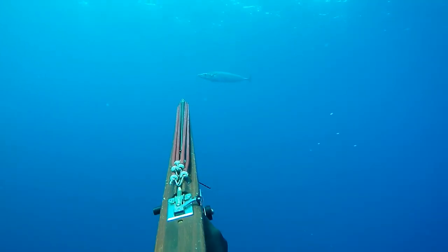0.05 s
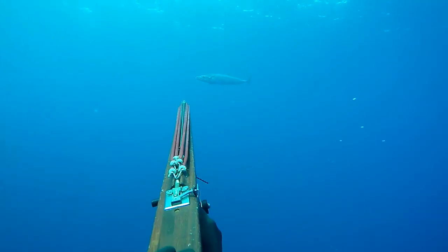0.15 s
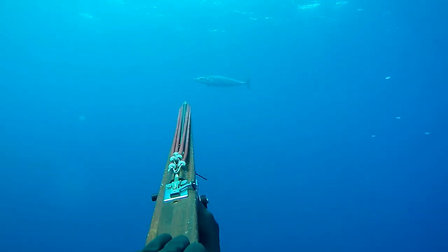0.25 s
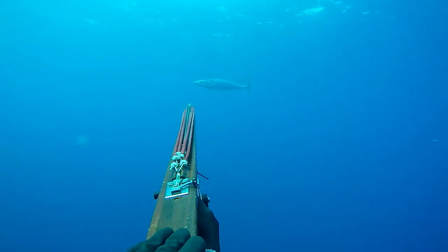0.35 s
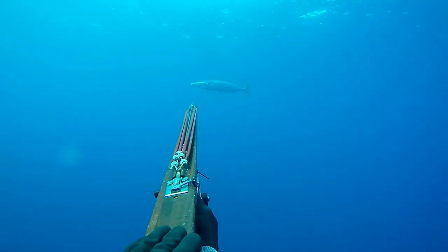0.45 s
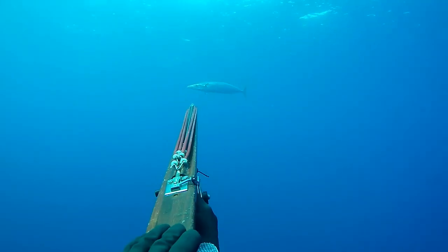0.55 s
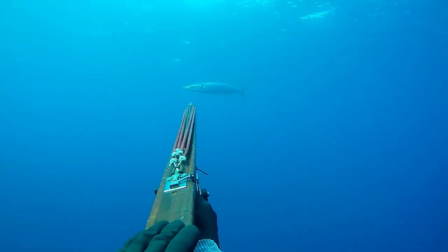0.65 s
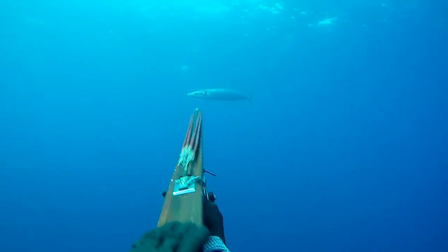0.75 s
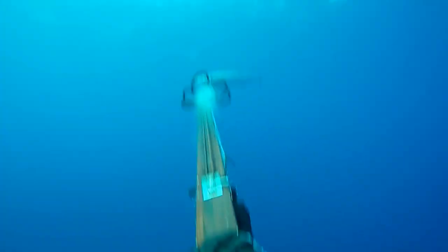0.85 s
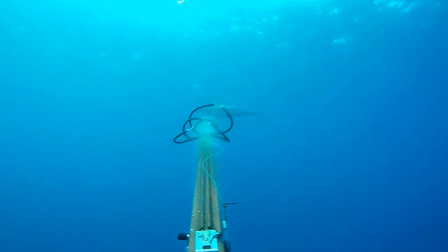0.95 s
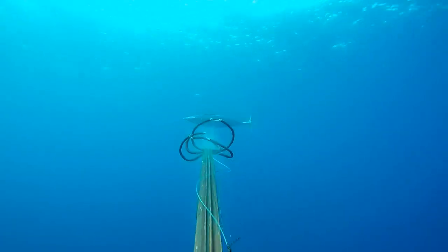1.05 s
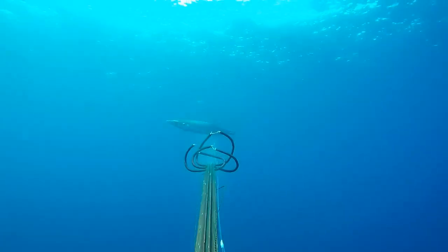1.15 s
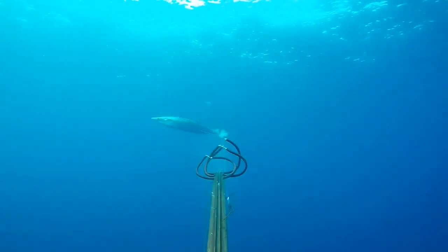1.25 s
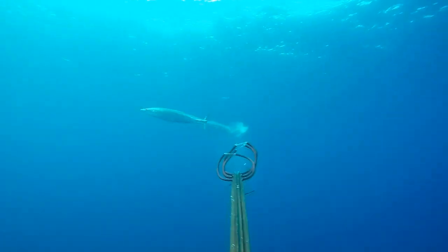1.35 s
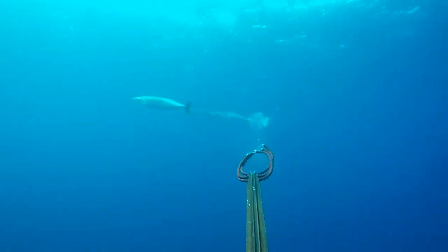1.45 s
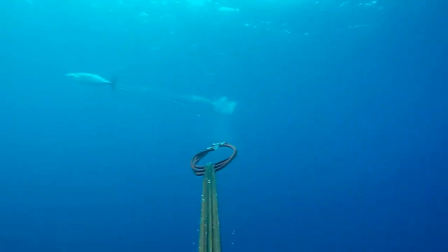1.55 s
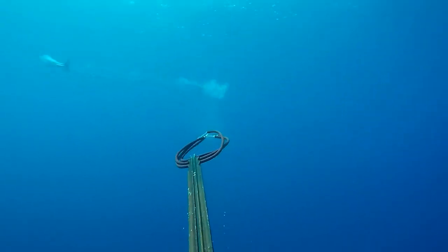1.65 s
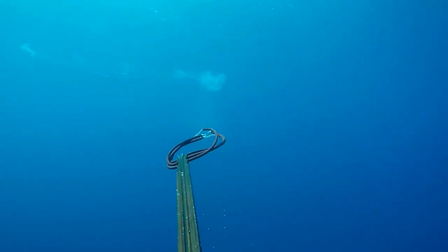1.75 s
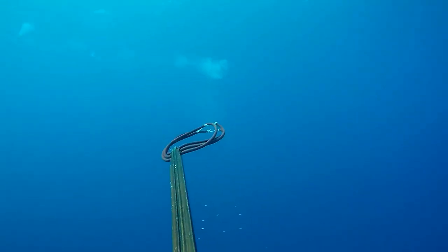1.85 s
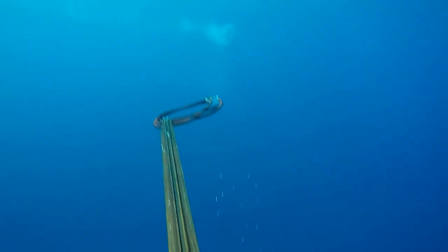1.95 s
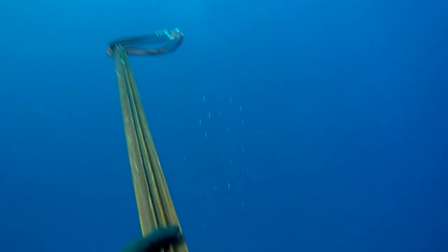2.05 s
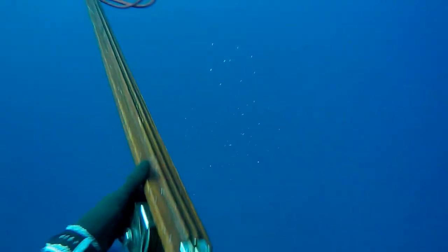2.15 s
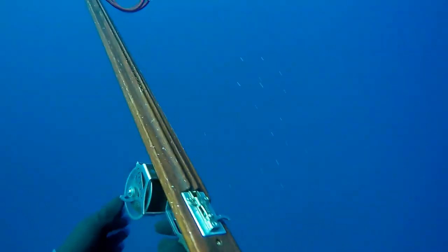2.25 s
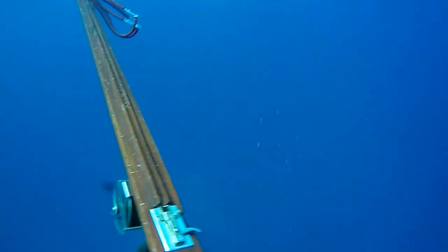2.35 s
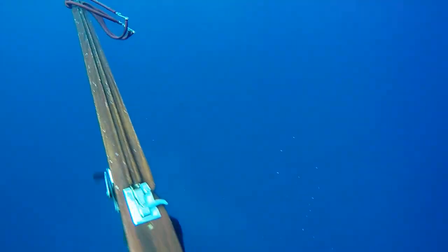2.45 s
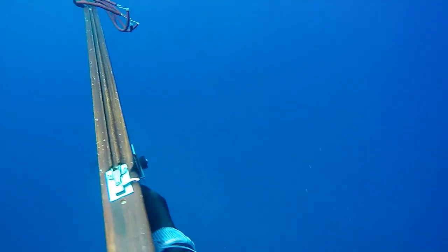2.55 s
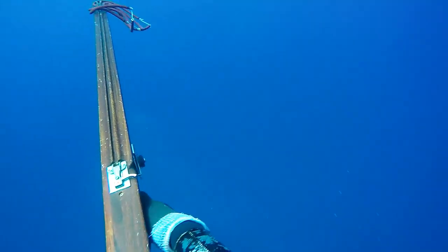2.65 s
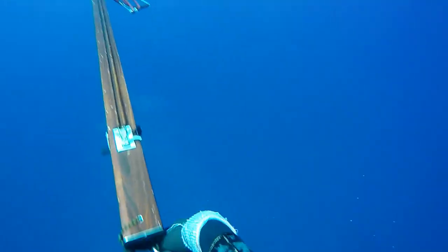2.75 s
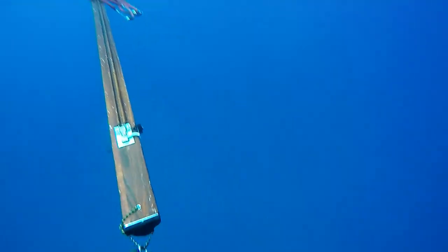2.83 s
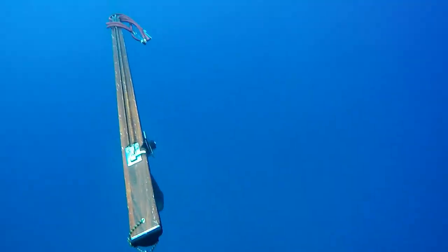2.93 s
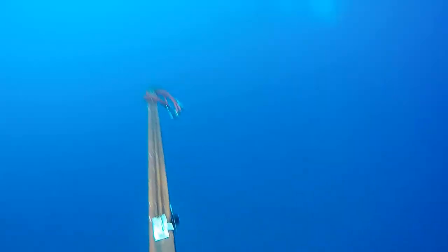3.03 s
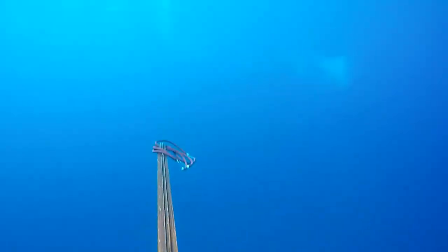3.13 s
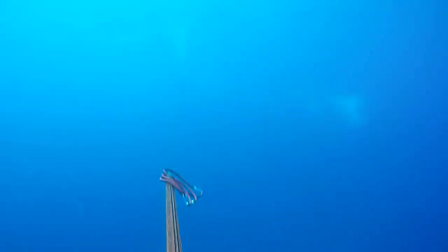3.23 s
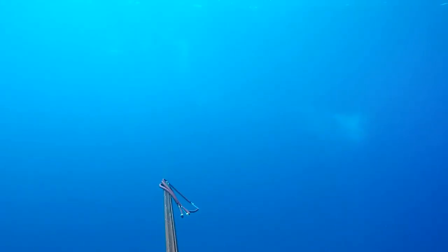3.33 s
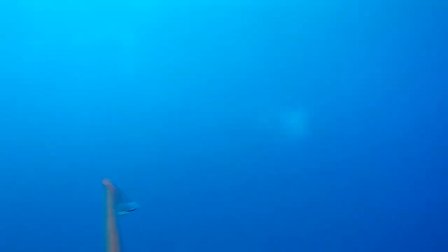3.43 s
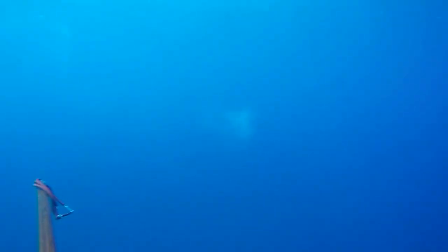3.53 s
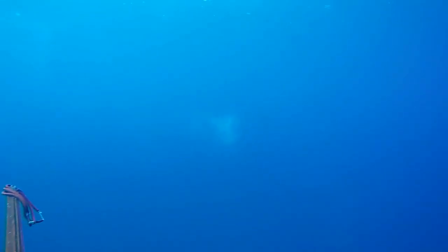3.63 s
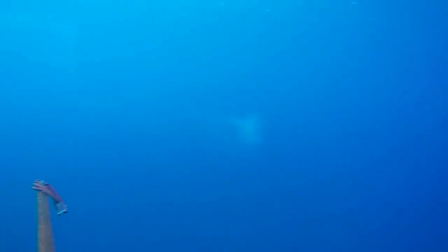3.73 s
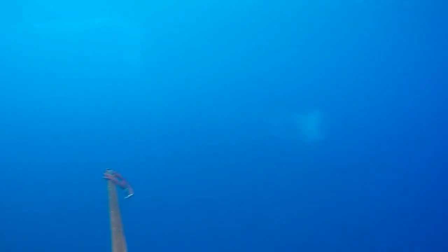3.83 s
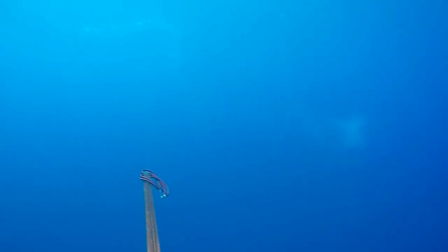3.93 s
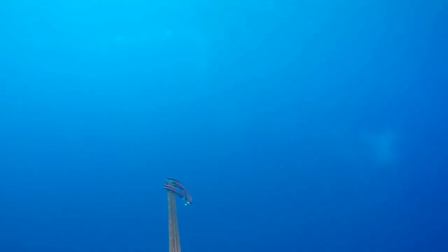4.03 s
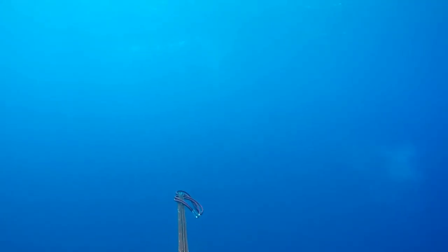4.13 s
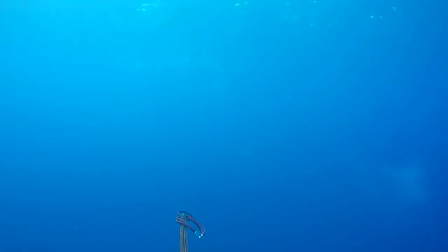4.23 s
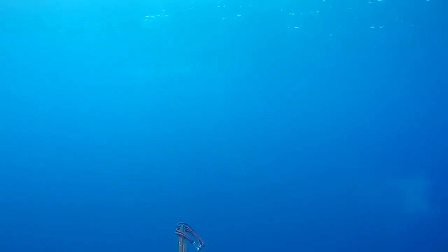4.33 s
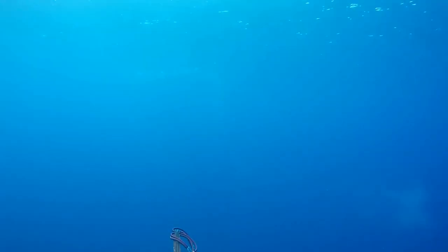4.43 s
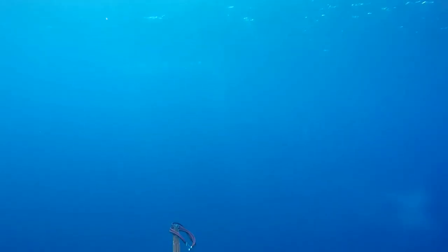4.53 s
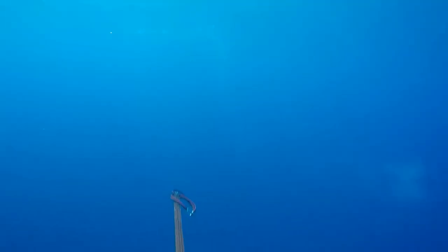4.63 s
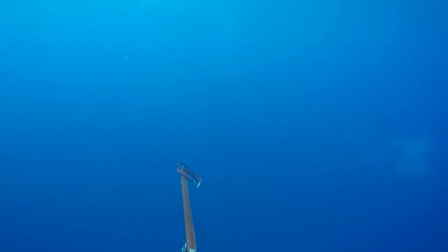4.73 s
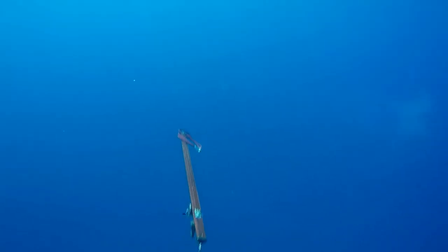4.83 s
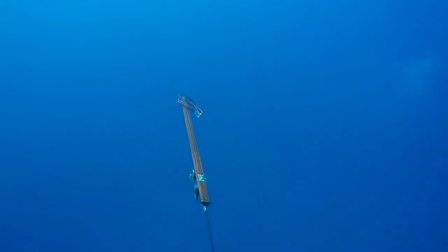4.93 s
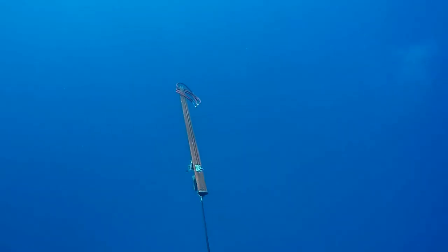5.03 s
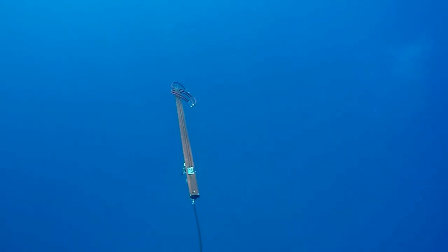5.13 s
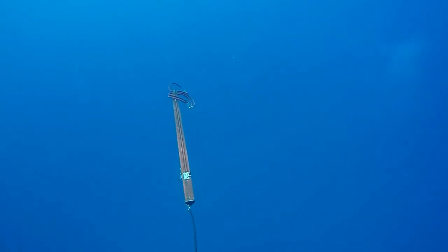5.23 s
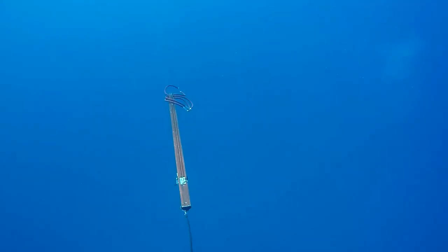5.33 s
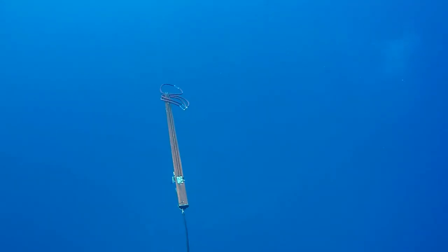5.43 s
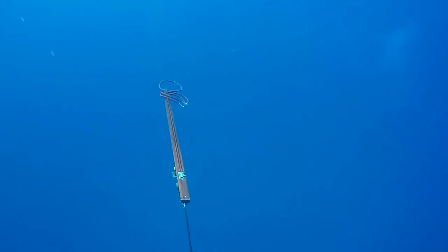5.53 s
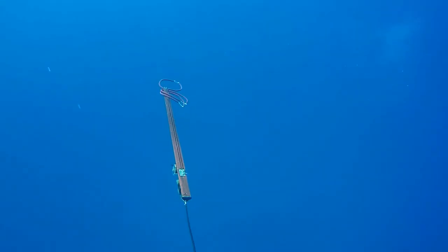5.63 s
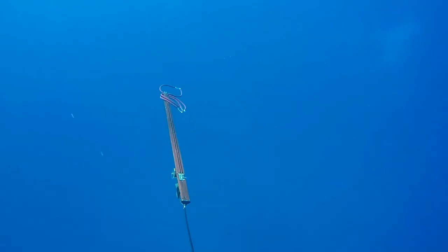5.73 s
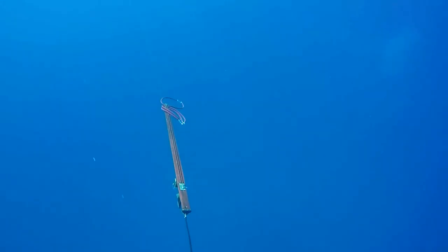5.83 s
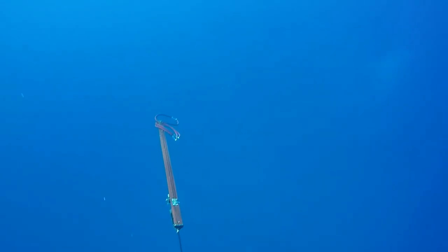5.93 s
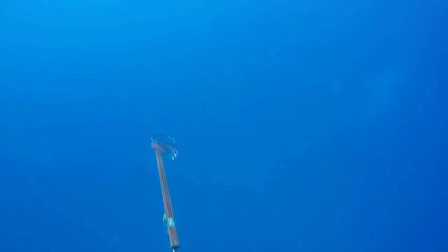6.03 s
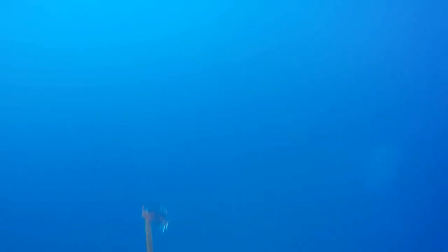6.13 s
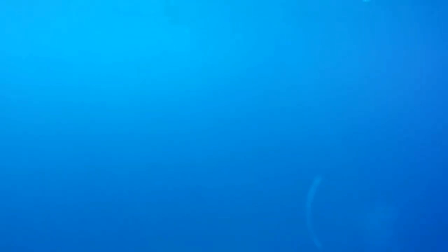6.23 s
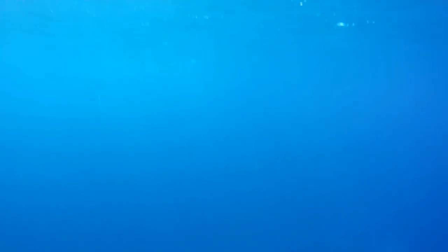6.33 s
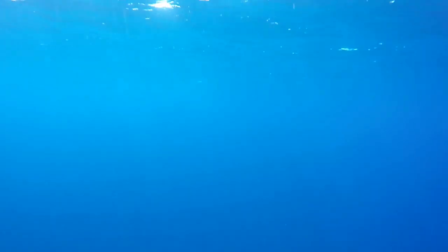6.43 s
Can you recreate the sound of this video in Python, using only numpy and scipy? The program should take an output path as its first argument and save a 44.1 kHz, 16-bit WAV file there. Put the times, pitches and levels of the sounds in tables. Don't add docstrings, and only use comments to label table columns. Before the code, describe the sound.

Underwater, close inside a plastic camera housing: low soft rumble and faint clicks, then a speargun fires with a hard boxy crack and deep thump. Fizz fades quickly into near quiet. A reel bursts into rapid rattling with gulping bubbles and loud knocks, then smooths into a rushing hiss with a hollow sweeping colour and tiny pings. Low thumps bump the housing until the end.

```python
import sys
import numpy as np
from scipy import signal
from scipy.fft import rfft, irfft
from scipy.io import wavfile
from scipy.ndimage import uniform_filter1d

SR = 44100
rng = np.random.default_rng(int(sys.argv[2]) if len(sys.argv) > 2 else 0)


def voltage_ratio(decibels):
    exponent = np.asarray(decibels, float) / 20
    return 10 ** exponent


def to_wav(sig):
    pcm = np.clip(np.atleast_2d(sig), -1, 1) * 32767
    pcm = np.round(pcm).astype(np.int16)
    wavfile.write(sys.argv[1], SR, pcm.T)


N = 285768
T = np.arange(N) / SR

# (frequency [Hz], width [Hz], level [dB])
WALL_MODES = [(307, 360, -9.5), (721, 240, -6.5), (950, 166, -6), (1370, 530, -8.5), (2156, 304, 2.5),
              (3668, 830, -7), (4520, 400, -17), (6320, 1200, -22), (7670, 470, -34), (9650, 2500, -32.5),
              (11860, 1900, -35), (13300, 900, -43)]
# (frequency [Hz], width [Hz], gain [dB])
WALL_VALLEYS = [(1108, 190, -3.5), (1710, 360, 1), (2610, 143, -10.5), (2958, 150, -9.5), (5650, 210, -9),
                (7160, 380, -5), (8740, 500, -2.5), (11300, 500, -3)]

# (time [s], swell level [dB])
FLOW = [(0.0, -34.5), (0.3, -40.5), (0.5, -37.5), (0.74, -36), (1.0, -25.5), (1.5, -26.5), (2.0, -23.5),
        (2.5, -21), (2.9, -18), (3.5, -26), (3.9, -22.5), (4.4, -28), (5.1, -23), (5.55, -30), (5.8, -20.5),
        (6.0, -26), (6.48, -20)]
# (middle [s], extra swell [dB], extra flutter [dB], half length [s])
EDDIES = [(0.0, 11.5, -10, 0.052), (0.08, -6, -9, 0.054), (.434, 6, -12, 0.045), (0.937, -3, 11, .05),
          (1.253, 3, -19, 0.11), (1.65, 12, 3.5, 0.094), (1.886, 8, -6, 0.082), (1.97, -2.5, 8, 0.093),
          (2.063, 5, 2, 0.059), (2.197, 0.5, 10, 0.11), (1.46, -3.5, 0, 0.046), (2.337, 8.5, -10, 0.026),
          (2.376, -25, -5, 0.032), (2.453, -1.5, -2, 0.082), (2.65, -11, -7, 0.085),
          (2.922, -2.5, -17, 0.13), (3.272, 3, 6, 0.14), (3.793, 6, -6, 0.14), (3.923, -3.5, 5.5, 0.043),
          (4.113, 1.5, -15, 0.041), (4.19, 2, 25, 0.048), (4.242, -18, 4.5, 0.038), (4.6, 5.5, -4, 0.18),
          (5.905, -4, 3, 0.33), (6.105, 11.5, 6, 0.054), (6.23, 3.5, 5.5, 0.042), (6.296, -0.5, 3.5, 0.043)]
FLUTTER_DB, FLUTTER_GROWTH = -40.5, 1.45
# (middle [s], peak
# level [dB], frequency [Hz], length [cycles])
THUMPS = [(.833, -8, 35, 1.2), (.854, -11, 45, 1.3), (2.178, -12.5, 195, 2), (2.21, -14, 160, 1.9),
          (2.155, -23, 210, 4.3), (2.195, -18, 260, 2.7), (2.235, -16, 173, 2.5), (2.257, -16.5, 242, 3),
          (2.333, -20, 30, 1.2), (2.53, -20.5, 142, 4.8), (2.575, -24, 126, 3.2), (2.295, -16.5, 248, 6.1),
          (2.477, -14.5, 115, 1.6), (3.13, -18, 197, 9.2), (3.31, -27, 136.3, 2.2),
          (4.07, -18, 151.2, 1.74), (4.196, -2.5, 101.4, 7.1), (4.45, -15.5, 143, 1.94),
          (4.565, -15.5, 107, 1.9), (4.908, -9.5, 79, 1.3), (4.965, -21.5, 105.2, 4.3),
          (5.781, -0.5, 134, 2), (5.93, -31.5, 108.4, 6.7), (6.094, -6.5, 104, 2.23), (6.41, -12, 31.8, 3)]
# (middle [s], peak level [dB], frequency [Hz], length [cycles])
RECOIL = [(.794, -8.5, 28.5, 2.2), (.82, 0.4, 83, 1.52), (.848, -16.5, 113, 2.2), (.864, -9, 12.4, 1.3),
          (.885, -12, 49, 1), (.908, -11.5, 27, 2.7), (.95, -20, 20, 2.3)]
# ((pitch [Hz], sag [Hz/s], width [Hz], rise [s], fall [s]), swells (time [s], hold [s], level [dB]))
SONGS = [
    ((152, 5, 62, 0.38, 0.14), [(1.0, 1, -50.5), (1.6, 0.44, -34.5), (2.25, 0.0079, -22.5), (2.55, 0.0082, -35.5), (3.35, 0.1, -41.5)]),
    ((6540, 26, 450, 0.6, .07), [(2.5, 0.98, -59), (3.6, .6, -56.5)]),
    ((5300, 260, 160, .2, 0.16), [(4.3, 0.11, -65), (4.5, .2, -65)]),
    ((640, 86, 285, 0.37, 0.39), [(5.62, 0.41, -44), (6.1, 0.56, -46)]),
]

# (time [s], peak level [dB], pitch [Hz], decay by 60 dB [s])
BUBBLES = [(.813, -12, 1000, .02), (.818, -9, 2330, .03), (.832, -16, 520, .025), (.833, -11, 2250, .025),
           (.838, -14, 1450, .03), (.845, -14, 3700, .02), (.849, -9.5, 720, .035), (.853, -9, 2300, .025),
           (.888, -21, 2200, .04), (.995, -33, 950, .049), (1.075, -30.5, 2270, .06),
           (1.079, -36, 1160, .06), (1.08, -36, 1900, .04), (1.13, -40, 1830, .04), (1.183, -44, 950, .044),
           (1.21, -26.5, 905, .037), (1.211, -39, 3550, .035), (1.36, -37, 800, .038),
           (1.423, -24.5, 1320, .075), (1.424, -33, 1550, .03), (1.45, -40, 1750, .03),
           (1.481, -34.5, 8200, .006), (1.481, -33, 1450, .015), (1.556, -34, 6300, .025),
           (1.966, -16.5, 4400, .024), (1.975, -5.5, 1110, .066), (1.976, -13.5, 3050, .027),
           (2.026, -13, 2310, .049), (2.026, -7, 1350, .025), (2.035, -5, 1695, .019),
           (2.039, -4.5, 1207, .044), (2.041, -16, 7900, .011), (2.091, -23, 538, .07),
           (2.244, -15, 1300, .07), (2.288, -19, 1650, .05), (2.584, -21.5, 1640, .067),
           (3.795, -25, 400, .035), (4.05, -49, 7700, .015), (4.205, -50, 8500, .012),
           (4.205, -42, 6750, .025), (4.68, -50, 7700, .02), (5.61, -23, 615, .049),
           (5.611, -21.5, 316, .027), (6.229, -31, 1110, .032), (6.252, -35, 7600, .012),
           (6.252, -40, 5240, .0094), (6.264, -31, 8940, .0075), (6.265, -23, 5050, .013),
           (6.359, -48, 10500, .012)]
# (time [s], peak level [dB], pitch [Hz])
PINGS = [(2.3643, -37, 6500), (2.39, -33, 6500), (2.4162, -41, 6500), (2.4421, -37, 6420),
         (2.4706, -41, 6480), (2.49, -37, 6430), (2.5683, -40, 6370), (2.6726, -46, 6530),
         (2.696, -37, 6300), (2.957, -39, 6350), (3.0752, -39, 6570), (3.1256, -42, 6440),
         (3.145, -38, 6570), (3.2253, -39, 6600), (3.2423, -34, 6440), (3.2687, -31, 6500),
         (3.295, -29, 6520), (3.3201, -34, 6700), (3.3471, -33, 6500), (3.3955, -44, 6540),
         (3.4219, -42, 6450), (3.4583, -42, 6420), (3.5491, -41, 6400), (3.573, -34, 6750),
         (3.605, -45, 6650), (3.6564, -33, 6720), (3.6833, -32, 6440), (3.7077, -40, 6500),
         (3.7536, -41, 6650), (3.7891, -39, 4900), (3.801, -40, 6720), (3.824, -37, 6440),
         (3.8584, -37, 6100), (3.8789, -36, 6430), (3.9053, -34, 6400), (3.9452, -39, 6500),
         (3.9637, -36, 6400), (4.0056, -45, 6420), (4.024, -44, 6440), (4.0789, -40, 6560),
         (4.1517, -43, 6730), (4.1901, -40, 6520), (4.2076, -37, 6250), (4.3253, -46, 5150),
         (4.3712, -46, 6440), (4.4984, -48, 5200), (4.5448, -47, 5330), (4.6087, -47, 4990),
         (4.681, -47, 6100)]
# (time [s], peak level [dB], pitch [Hz])
GULPS = [(1.527, -26, 735), (1.576, -19, 1170), (1.59, -16, 707), (1.615, -14, 683), (1.635, -8, 950),
         (1.684, -18, 970), (1.714, -18, 713), (1.721, -14, 716), (1.747, -16, 700), (1.778, -19, 950),
         (1.811, -13, 930), (1.837, -17, 736), (1.857, -13, 1010), (1.874, -18, 790), (1.9, -12, 764),
         (1.914, -23, 797), (1.935, -15, 756), (2.08, -23, 930), (2.137, -19, 990), (2.156, -23, 870)]

# (time [s], peak level [dB], body re. peak [dB], treble re. peak [dB])
GEAR_KNOCKS = [(.0554, -42, -26, 2), (.0732, -40, -21, -12), (.341, -49.5, -12, 6), (.6933, -47, -19, 0),
               (.703, -48, -19, 3), (.794, -30, -9, -4), (.8111, -2.5, -6, -14), (.8804, -17.5, 5.5, -6),
               (.914, -22, -7, -6), (.906, -32, -10, 6), (.952, -36, -10, 1), (.9188, -11.5, -6.5, -2.5),
               (.9632, -14.5, -7, -6.5), (.9685, -23.5, 0, -12), (.9764, -23, -18, -1.5),
               (1.0284, -47, -7, 3), (1.054, -39, -10, -1), (1.0745, -38, -7, 3), (1.0814, -35, -12, -10),
               (1.2087, -60, 4, -5), (1.2685, -42, -4, 0), (1.2815, -42, -1, -10), (1.3064, -41, -14, -12),
               (1.3374, -40.5, -8, -0.5), (1.4217, -46, 8, -18), (1.4516, -38, -2, -24),
               (1.48, -39.5, 1, -5), (6.2274, -34, -1, 6.5)]
# (time [s], peak level [dB], body re. peak [dB], treble re. peak [dB])
REEL_KNOCKS = [(1.512, -25, -16, -28.5), (1.5424, -22, -3, -19), (1.5914, -19, 4, -5),
               (1.6312, -5, -1.5, -5.5), (1.6354, -5, -12, -30), (1.6555, -12, -3, -2),
               (1.6811, -9, -6, -4.5), (1.686, -16, 0, -8), (1.7024, -16, 2, -3), (1.708, -16, -7, -6),
               (1.7204, -18, -10, -14), (1.7399, -7.5, 0.5, -8), (1.745, -14.5, -0.5, -9),
               (1.752, -23, -3, -16), (1.798, -21, -14, -16), (1.8806, -14, -1, -8), (1.995, -19, 0, -9),
               (2.197, -12, -4, -7), (2.0368, -12, 2.5, -5), (2.2383, 6.5, -5, -20), (2.2807, 1, -3, -10),
               (2.287, -15.5, -4, -6), (2.39, -25, -8, -12), (2.413, -30, -16, -14), (2.575, -22, -10, -15),
               (2.634, -29, -10, -4), (2.3184, -24, -10, 1.5), (3.1677, -15.5, -7, -14),
               (3.2425, -12, -5.5, -7), (3.2959, -22.5, -4, -2), (4.3712, -37, -10, 2.5),
               (3.7544, -12, -28, -13), (3.7898, -16, -3, -12.5), (3.8247, -9, -8, -12),
               (3.8591, -8, -8, -11.5)]
SCRAPE_S = 0.00221

# (time [s], level [dB], brightness [dB])
SHOT = [(.811, -15.5, 8.5), (.823, -15, -6.5), (.855, -12, -5.5), (.866, -21.5, -5.5), (.912, -34.5, -6),
        (.921, -23.5, -1.5), (.932, -48, 10), (.96, -42, 0), (.998, -53, 11)]
TEAR_BODY_DB, BOOM_DB, BOOM_FALL_DB_PER_S = -6, -16.5, 325

# (time [s], level of its rush [dB])
PULL = [(1.49, -70), (1.51, -38.5), (1.566, -30), (1.676, -29), (1.718, -25.5), (1.772, -27), (1.876, -26),
        (2.13, -24.5), (2.3, -30), (2.62, -31.5), (2.78, -28), (3.3, -29), (3.61, -32.5), (4.56, -34),
        (5.31, -39), (5.55, -39.5), (6.07, -36.5), (6.48, -41)]
# (time [s], speed [turns/s], chatter depth [0-1])
REEL = [(1.48, 44, 0.1), (1.52, 37.8, 1), (1.75, 47, 0.8), (2.0, 40, 0.55), (2.3, 27, 0.03),
        (3.0, 32, 0.28), (3.9, 36, 0.07), (6.48, 26, 0.08)]
# (time [s], first notch [Hz], strength [0-1])
MIRROR = [(2.57, 700, 0.02), (2.6, 900, .8), (2.65, 1050, .95), (2.74, 1200, .95), (2.82, 1620, .9),
          (2.93, 1620, .85), (3.05, 1720, .8), (3.2, 1750, 0.02)]
BAND_EDGES_HZ = [280, 1750, 2800, 5600, 16000]
PULL_COLOUR_DB = [-4, 0, -11, -21.5]
PULL_GROWTH = [1.23, 1.04, 0.96, 0.93]
DRIFT_DB_PER_S = [0.24, -0.3, 0.42, -0.6]
STILL_DB = [-67.5, -73.5, -62, -65]
CHATTER_SHARE = [0.71, 0.79, 0.87, 0.3]
AIM_S, AIM_DB = 0.77, [-78, -56, -59, -81]
WAKE_S, WAKE_DB = 0.92, [-55.5, -50.5, -53, -79]
WAKE_FALL_DB_PER_S = [15, 19, 79, 20]
NEAR_DB, LET_GO_S, LET_GO_LENGTH_S = [-1, -1, 1.5, 3.5], 3.03, 0.065
SHADOW_S, SHADOW_HALF_S = 2.617, 0.016
SHADOW_DB = [-8.5, -3.5, -4, 2]
GURGLES_PER_S, GURGLE_HZ, GURGLE_DB = 200, (686, 1995), 7
SPARKLES_PER_S, SPARKLE_HZ, SPARKLE_DB = 280, (6790, 13240), -16.5
SPARKLE_S, SPARKLE_FADE_S = 1.52, .5


def curves(table):
    s, *columns = np.transpose(table)
    return [np.interp(T, s, c) for c in columns]


def unit(x):
    return x / np.sqrt(np.mean(x ** 2))


def band(x, lo_hz, hi_hz, order=3):
    return signal.sosfilt(signal.butter(order, [lo_hz, hi_hz], "band", fs=SR, output="sos"), x)


def lowpass(x, hz, order):
    return signal.sosfilt(signal.butter(order, hz, fs=SR, output="sos"), x)


def walk(rate):
    hold = int(SR / rate)
    steps = np.repeat(rng.standard_normal(N // hold + 1), hold)
    return unit(uniform_filter1d(uniform_filter1d(steps, hold), hold)[:N])


def together(*db):
    return 10 * np.log10(sum(voltage_ratio(d) ** 2 for d in db))


def wall_response():
    hz = np.linspace(0, SR / 2, 2049)
    power = sum(voltage_ratio(db) ** 2 / (1 + (2 * (hz - f) / w) ** 2) ** 1.616 for f, w, db in WALL_MODES)
    valley_db = sum(db / (1 + (2 * (hz - f) / w) ** 2) for f, w, db in WALL_VALLEYS)
    power = power * voltage_ratio(valley_db) ** 2
    cepstrum = irfft(np.log(power + 1e-9) / 2)
    cepstrum[1:2048] *= 2
    cepstrum[2049:] = 0
    return irfft(np.exp(rfft(cepstrum)))


def housing(x):
    return signal.fftconvolve(x, wall_response())[:len(x)]


def buffet():
    flow_db, = curves(FLOW)
    swell_db = flow_db
    flutter_db = FLUTTER_DB + FLUTTER_GROWTH * (flow_db + 25)
    for s, more_swell_db, more_flutter_db, half_s in EDDIES:
        shape = 1 / (1 + ((T - s) / half_s) ** 2) ** 2
        swell_db = swell_db + more_swell_db * shape
        flutter_db = flutter_db + more_flutter_db * shape
    swell = unit(band(rng.standard_normal(N), 13.9, 38.9, order=2))
    flutter = unit(band(band(rng.standard_normal(N), 33.0, 241, order=3), 40, 102, order=1))
    return swell * voltage_ratio(swell_db - 1.5) + flutter * voltage_ratio(flutter_db + 4.7 * walk(12))


def pushes(table, overtone):
    out = np.zeros(N)
    for s, db, hz, cycles in table:
        near = slice(int((s - .15) * SR), int((s + .15) * SR))
        turn = (T[near] - s) * hz
        swell = np.exp(-(np.pi * turn / cycles) ** 2)
        overtones = np.cos(4 * np.pi * turn) + 0.45 * np.cos(6 * np.pi * turn)
        sway = np.cos(2 * np.pi * turn) + overtone * swell * overtones
        out[near] += voltage_ratio(db) * sway * swell
    return out


def songs():
    out = np.zeros(N)
    for (hz, sag, width_hz, rise, fall), swells in SONGS:
        levels = []
        for s, hold, peak_db in swells:
            away = np.maximum((s - T) / rise, (T - s - hold) / fall)
            levels.append(peak_db - 30 * away.clip(0, 4))
        db = together(*levels)
        pitch = np.maximum(hz - sag * np.maximum(T - swells[0][0], 0), hz / 2)
        phase = 2 * np.pi * np.cumsum(pitch * (1 + .015 * walk(60))) / SR
        blur = walk(width_hz) * np.cos(phase) + walk(width_hz) * np.sin(phase)
        out += blur * voltage_ratio(db + 3.3 * walk(70))
    return out


def bubbles():
    out, wobble = np.zeros(N), voltage_ratio(1.9 * walk(300))
    for s, db, hz, t60 in BUBBLES:
        t = T[:int(t60 * SR)]
        phase = 2 * np.pi * hz * np.cumsum(1 + 0.2 * np.exp(-t / 0.00036) + 0.81 * t) / SR
        envelope = 1000. ** (-t / t60) * (1 - np.exp(-t * hz / .3))
        out[int(s * SR):int(s * SR) + len(t)] += voltage_ratio(db) * np.sin(phase) * envelope
    return out * wobble


def pops(table, cycles, db_shift):
    out = np.zeros(N)
    for s, db, hz in table:
        turn = T[:int(cycles / hz * SR)] * hz
        life = turn / cycles
        ring = np.sin(2 * np.pi * turn * (1 + .012 * life))
        envelope = 1000. ** (-life) * (1 - np.exp(-life / 0.055))
        out[int(s * SR):int(s * SR) + len(turn)] += voltage_ratio(db + db_shift) * ring * envelope
    return out


def knocks():
    out, t = np.zeros(N), T[:1500]
    ranges_hz = (1600, 2800), (500, 1600), (2800, 16000), (7000, 16000)
    walls = wall_response()[:1500]
    rings = [band(walls, lo, hi) for lo, hi in ranges_hz]
    for s, db, body_db, treble_db in GEAR_KNOCKS + REEL_KNOCKS:
        scrape = rng.standard_normal(len(t)) * (np.exp(-t / SCRAPE_S) + 0.21 * np.exp(-t / 0.0058))
        hit = .6 * scrape / np.sqrt(np.sum(scrape ** 2))
        hit[0] += .8
        hit[int(SCRAPE_S * SR / 2)] -= .4
        for ring, rel_db in zip(rings, (0, body_db, treble_db, treble_db - 39.0)):
            rung = signal.fftconvolve(hit, ring)[:len(t)]
            out[int(s * SR):int(s * SR) + len(t)] += rung * voltage_ratio(db + rel_db) / np.abs(rung).max()
    return out


def shot():
    db, bright_db = curves(SHOT)
    noise = rng.standard_normal(N) * voltage_ratio(2 * walk(500))
    through_walls = housing(noise)
    body = unit(band(through_walls, 450, 1600))
    middle = unit(band(through_walls, 1600, 2800))
    treble = unit(band(through_walls, 2800, 16000) + band(through_walls, 5500, 7500))
    tear = middle + voltage_ratio(TEAR_BODY_DB) * body + voltage_ratio(bright_db) * treble
    start, end = SHOT[0][0], SHOT[-1][0]
    boom = unit(band(noise, 90, 450)) * voltage_ratio(BOOM_DB - BOOM_FALL_DB_PER_S * np.abs(T - start))
    return (tear * voltage_ratio(db) + boom) * (T > start) * (T < end)


def sparkle():
    out, t = np.zeros(N + 400), T[:400]
    lo_hz, hi_hz = SPARKLE_HZ
    for when, pitch, size in rng.random((int(SPARKLES_PER_S * 2), 3)):
        hz = lo_hz * (hi_hz / lo_hz) ** pitch
        i = min(int((SPARKLE_S - SPARKLE_FADE_S * np.log(when)) * SR), N)
        ring = np.sin(2 * np.pi * hz * t * (1 + 5 * t))
        envelope = np.exp(-t * hz / 25) * (1 - np.exp(-t / 0.0005))
        out[i:i + len(t)] += voltage_ratio(-14 * size) * ring * envelope
    return out[:N] * voltage_ratio(curves(PULL)[0] + SPARKLE_DB)


def gurgle():
    out, t = np.zeros(N + 800), T[:800]
    lo_hz, hi_hz = GURGLE_HZ
    for when, pitch, size in rng.random((int(GURGLES_PER_S * 5), 3)):
        hz = lo_hz * (hi_hz / lo_hz) ** (pitch ** 1.5)
        i = int((1.5 + when * (N / SR - 1.5)) * SR)
        ring = np.sin(2 * np.pi * hz * t * (1 + 7.4 * t))
        out[i:i + len(t)] += voltage_ratio(29.0 * size) * ring * np.exp(-t * hz / 10.0)
    return out[:N] / np.std(out[out != 0])


def rush_levels():
    pull, = curves(PULL)
    beside = (1 - np.tanh((T - LET_GO_S) / LET_GO_LENGTH_S)) / 2
    hidden = np.exp(-((T - SHADOW_S) / SHADOW_HALF_S) ** 4)
    silent = -99
    levels = []
    for k in range(4):
        line = -30 + PULL_COLOUR_DB[k] + PULL_GROWTH[k] * (pull + 30) + DRIFT_DB_PER_S[k] * (T - 2.5)
        line = line + NEAR_DB[k] * beside + SHADOW_DB[k] * hidden
        line = np.where(T > PULL[0][0], line, silent)
        aim = np.where((T > AIM_S) & (T < WAKE_S), AIM_DB[k], silent)
        wake = np.where(T > WAKE_S, WAKE_DB[k] - WAKE_FALL_DB_PER_S[k] * (T - WAKE_S), silent)
        levels.append(together(line, STILL_DB[k] + 0 * T, aim, wake))
    return levels


def mirror(hiss):
    notch_hz, strength = curves(MIRROR)
    strength = np.clip(strength, 0, 1) * (T > MIRROR[0][0]) * (T < MIRROR[-1][0])
    mirrored = lowpass(np.interp(T - .93 / notch_hz, T, hiss), 2800, 1)
    return (hiss - strength * mirrored) / np.sqrt(1 + strength ** 2)


def rush():
    turns, depth = curves(REEL)
    phase = np.cumsum(turns * (1 + 0.064 * walk(20)) / SR) % 1
    chatter = 1 + np.clip(depth, 0, 1) * .9 * np.exp(-phase / .2) * (1 + np.tanh(walk(40)))
    fizz = voltage_ratio((1.07 + 1.7 * depth) * walk(400))
    hiss = mirror(housing(rng.standard_normal(N) * fizz))
    hiss = hiss + 0.26 * np.interp(T - 0.001603 * voltage_ratio(1.44 * walk(2.5)), T, hiss)
    levels, swell = rush_levels(), walk(5.14)
    bands = np.zeros(N)
    for lo, hi, db, share in zip(BAND_EDGES_HZ, BAND_EDGES_HZ[1:], levels, CHATTER_SHARE):
        flicker_db = swell / 2 + walk(15)
        bands += unit(band(hiss * chatter ** share, lo, hi)) * voltage_ratio(db + flicker_db)
    return lowpass(bands, 14000, 6) + gurgle() * depth * chatter / 2 * voltage_ratio(levels[0] + GURGLE_DB)


def scene():
    water = buffet() + pushes(THUMPS, overtone=0.1) + songs()
    air = bubbles() + pops(PINGS, cycles=170, db_shift=.5) + pops(GULPS, cycles=24, db_shift=-1.5)
    gun = knocks() + shot() - pushes(RECOIL, overtone=0.064)
    reel = sparkle() + rush()
    return (water + air + gun + reel)[None]


def low_pass(x):
    return signal.sosfilt(signal.butter(12, 15920, fs=SR, output="sos"), x)


def record(dry):
    clipped = dry / (1 + np.abs(dry) ** 10) ** (1 / 10)
    top = signal.ellip(8, .2, 80, 15750, fs=SR, output="sos")
    mix = signal.sosfilt(top, clipped)
    return low_pass(mix)


dry = scene()
out = record(dry)
to_wav(out)
```